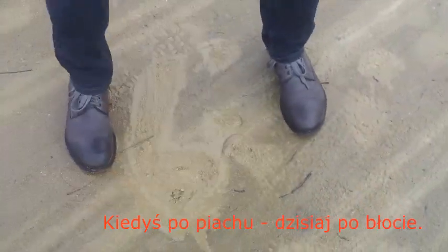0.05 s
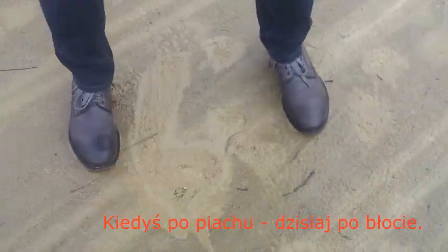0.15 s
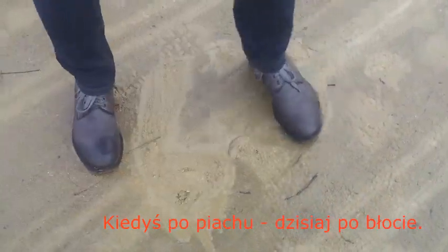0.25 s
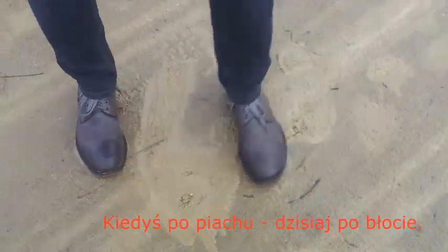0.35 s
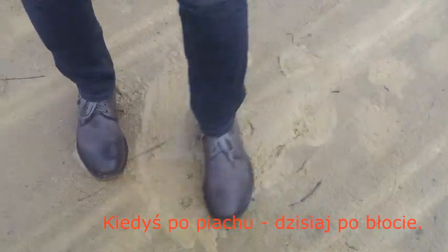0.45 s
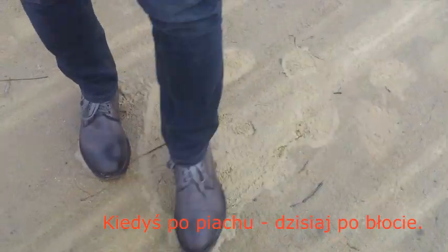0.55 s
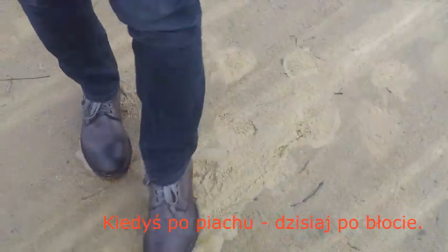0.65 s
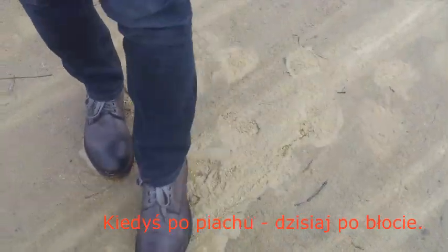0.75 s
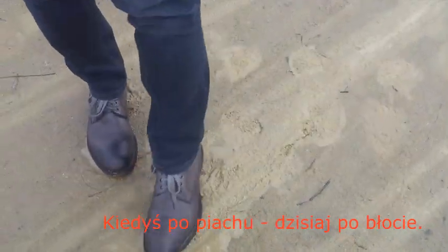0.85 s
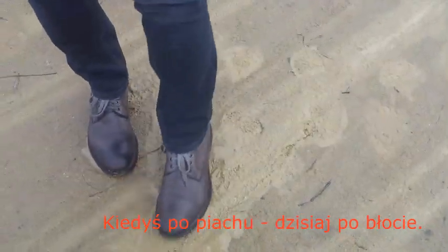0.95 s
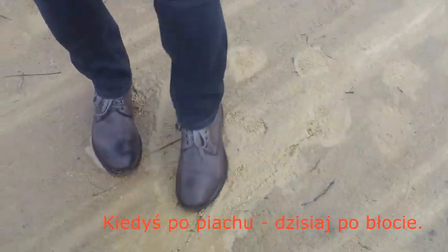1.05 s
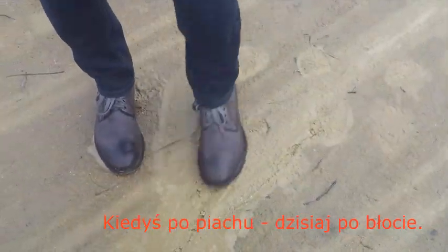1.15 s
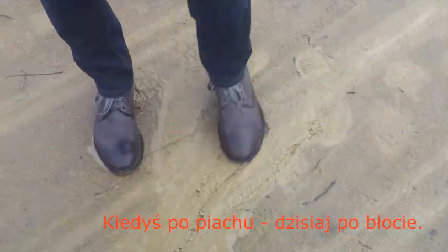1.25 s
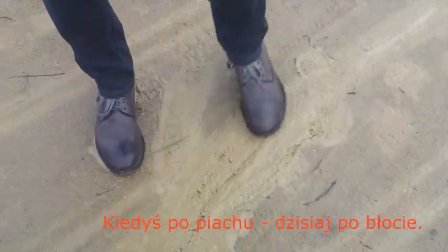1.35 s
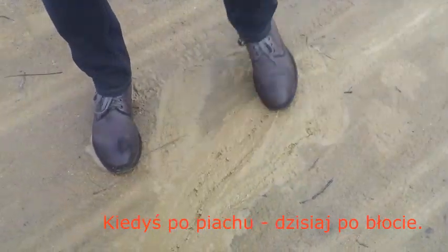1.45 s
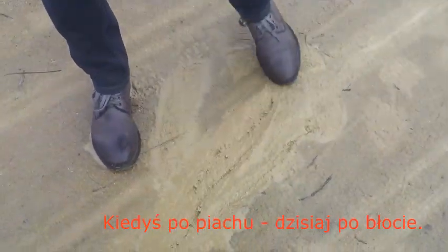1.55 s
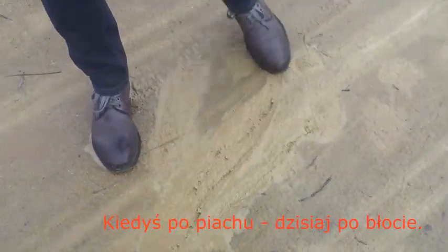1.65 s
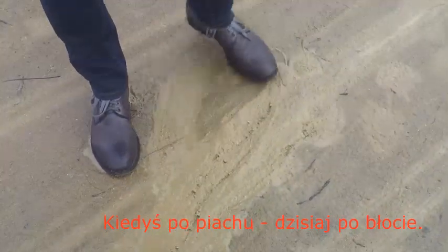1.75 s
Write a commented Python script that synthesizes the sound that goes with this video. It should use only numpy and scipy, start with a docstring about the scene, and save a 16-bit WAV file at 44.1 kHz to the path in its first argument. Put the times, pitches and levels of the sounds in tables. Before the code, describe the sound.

Close outdoor pickup of two gritty shoe scrapes in sand and mud: sharp crackle, squeaky slips and dull low thumps, a short lull between them, then a fade and tiny wet ticks over faint air.

```python
"""On a paved path, a shoe sole scrapes twice through wet sand and mud, close to a camera's microphone.
From about 0.2 s the first scrape crackles with clicking sand grains, sines ring for the slips of the sole,
noise bursts crunch as bigger grit and low sines thump in the mud. It thins near 0.75 s; the second scrape
builds from about 1 s and fades. Near 1.7 s a few drops tick with rising pitch as the shoe lifts.
Shaped noise, faint outdoor air, lies under it all."""
import sys
import numpy as np
from scipy import signal
from scipy.fft import rfft, irfft, next_fast_len
from scipy.io import wavfile
from scipy.ndimage import uniform_filter1d, map_coordinates

SR = 44100
rng = np.random.default_rng(int(sys.argv[2]) if len(sys.argv) > 2 else 0)


def log_audio(samples):
    """Write samples as a 16-bit WAV file to the path given in sys.argv[1]."""
    # one column per channel
    frames = np.atleast_2d(samples).T
    # limit to full scale, then quantise
    limited = np.clip(frames, -1, 1)
    pcm = np.round(limited * 32767).astype(np.int16)
    wavfile.write(sys.argv[1], SR, pcm)


N = 79380


def amp(db):
    """Decibels to amplitude."""
    return 10 ** (np.asarray(db) / 20)


def unit(x):
    """x scaled to rms 1."""
    return x / np.sqrt(np.mean(x ** 2) + 1e-20)


def along(points, hz):
    """Value at hz between (frequency, value) points on a log frequency axis."""
    point_hz, value = np.transpose(points)
    return np.interp(np.log(hz + 1), np.log(point_hz + 1), value)


def filtered(x, response):
    """x times a response of frequency, with zero padding for the tail."""
    m = next_fast_len(N + SR // 4)
    spectrum = rfft(x, m) * response(np.fft.rfftfreq(m, 1 / SR))
    return irfft(spectrum, m)[..., :N]


def band_unit(x, lo_hz, hi_hz):
    """x scaled so that its rms inside a band is 1."""
    return x / np.std(filtered(x, lambda hz: (hz > lo_hz) & (hz < hi_hz)))


def wobble(knots_per_s):
    """A smooth random curve through evenly spaced knots."""
    return map_coordinates(rng.standard_normal(4000), [np.arange(N) * knots_per_s / SR])


BIGGEST = 3  # cap on the random size step


def sizes(u, scatter_db):
    """Event sizes from uniform draws: many small, few large, none huge."""
    return amp(scatter_db * np.minimum(-np.log(1 - u), BIGGEST))


def crackle(per_s, scatter_db):
    """Random clicks of uneven size and either sign, rms 1."""
    chance, side, size = rng.random((3, N))
    happens = chance < per_s / SR
    return unit(happens * np.sign(side - .5) * sizes(size, scatter_db))


# The sole's path through the two scrapes; levels are relative, each layer adds its own trim:
# start_s, grit_db, gap_db (ring of the gap), mud_db (drag), tread_db (ring of the tread),
# tread_hz, grain_hz (pitch of the grains), fizz_db (over the grit)
STROKES = [(0.0, -51.5, -43, -61, -42.5, 4280, 6500, -3), (0.13, -43.5, -52.5, -50, -43.5, 4020, 5970, -19),
           (0.204, -42, -31.5, -43, -39, 3320, 5950, -9), (0.224, -33, -36, -48, -29, 3470, 6000, -13),
           (0.261, -18, -21.5, -29, -36, 3700, 6300, -18),
           (0.32, -16.5, -16.5, -40, -39, 4270, 6020, -15.5),
           (0.334, -21.5, -14.5, -39, -45, 3820, 6760, -16),
           (0.366, -17.5, -21.5, -33.5, -37, 3350, 6540, -10),
           (0.39, -25, -41, -39.5, -45, 3700, 6250, -11.5), (0.426, -25, -25, -36, -26, 3900, 6000, -18),
           (0.47, -27.5, -32, -40, -36, 3860, 6000, -16), (0.527, -23, -20, -37.5, -24, 3500, 6320, -9),
           (0.579, -34.5, -29, -40, -36, 3330, 6000, -10),
           (0.611, -27, -25.5, -40, -19.5, 3320, 6100, -5.5),
           (0.63, -33.5, -29.5, -38, -31, 3500, 6200, -10),
           (0.698, -27.5, -21.5, -41.5, -44, 3340, 6160, -10.5),
           (0.734, -48, -39, -53.5, -44, 4260, 6100, -14), (0.846, -30, -30, -44.5, -46, 4700, 5640, -12),
           (0.903, -34, -22.5, -40.5, -31, 3700, 6040, -8),
           (0.982, -23.5, -24.5, -41, -24.5, 4370, 5730, -11),
           (1.012, -22, -30, -45, -48, 4150, 5770, -4.5), (1.03, -20, -19, -46, -44, 4000, 6200, -17),
           (1.06, -29.5, -23.5, -33.5, -18, 4440, 5700, -8), (1.08, -17.5, -28, -47, -35, 4340, 5930, -13),
           (1.102, -27.5, -19, -42, -37, 3900, 5800, -5.5),
           (1.119, -22.5, -19, -45.5, -63, 3650, 6740, -13), (1.138, -18, -13.5, -39, -17, 3660, 6600, -5),
           (1.146, -15.5, -31, -39.5, -43, 3830, 6100, -14),
           (1.168, -29.5, -28, -38.5, -24, 4180, 5900, -7),
           (1.178, -21.5, -26.5, -39, -26, 4140, 6300, -10),
           (1.208, -24, -22.5, -44, -25, 4040, 6250, -16.5),
           (1.228, -22, -42, -40.5, -28, 4180, 5600, -10.5), (1.267, -25, -21, -35, -22.5, 3800, 6060, -12),
           (1.311, -19.5, -72, -34, -26, 4560, 6420, -8), (1.341, -23.5, -38, -40.5, -25, 3670, 6580, -9),
           (1.422, -28, -56, -42, -24, 4500, 6250, -8), (1.457, -25, -71, -37, -24, 4680, 6500, -4),
           (1.498, -34.5, -42, -42, -39, 4820, 6330, -2), (1.532, -35.5, -58, -43, -28, 5300, 5300, 3.5),
           (1.604, -42, -45.5, -51, -41.5, 4250, 5700, -13), (1.67, -52, -54, -64, -45, 4270, 6050, -5),
           (1.72, -61, -74, -80.5, -76, 4060, 6600, 1)]
STROKE_COLUMNS = ("start_s", "grit_db", "gap_db", "mud_db", "tread_db", "tread_hz", "grain_hz", "fizz_db")


def stroke(column):
    """One named stroke column, drawn as straight lines between its times."""
    rows = np.transpose(STROKES)
    return np.interp(np.arange(N) / SR, rows[0], rows[STROKE_COLUMNS.index(column)])


# Spectrum of crackling sand: pitch_hz, level_db (relative, per Hz)
GRIT = [(530, -23), (900, -11.5), (1750, -16.5), (2130, -7), (3170, -10), (3480, -4), (3960, -4.5),
        (4950, -6.5), (5490, -7.5), (6170, -2), (7620, -3), (10900, -13.5), (14600, -46)]
GRIT_PER_S, GRIT_SCATTER_DB, GRIT_CLUMP_DB = 5000, 3, 1
GRIT_DB, FIZZ_DB = -6, -1.5  # trims on the stroke levels
FIZZ_FROM_HZ = 7700


def grit():
    """Sand grains snap under the sole as clumped clicks; their finest fizz has its own share."""
    clumps_db = GRIT_CLUMP_DB * (wobble(60.07) + wobble(250))
    clicks = crackle(GRIT_PER_S, GRIT_SCATTER_DB) * amp(clumps_db)
    sand = filtered(clicks, lambda hz: amp(along(GRIT, hz)) * (hz < FIZZ_FROM_HZ))
    fizz = filtered(clicks, lambda hz: amp(along(GRIT, hz)) * (hz > FIZZ_FROM_HZ))
    sand = band_unit(sand, 4900, 7600) * amp(GRIT_DB)
    fizz = band_unit(fizz, 8000, 11500) * amp(stroke("fizz_db") + FIZZ_DB)
    return (sand + fizz) * amp(stroke("grit_db"))


SLIP_CLUMP_DB = 1.1


def slips(kind, level_db, pitch_hz):
    """Each slip of the sole rings for a few cycles near the pitch of the moment."""
    per_s, scatter_db, cycles, spread = kind
    when, detune, size, phase = rng.random((4, int(per_s * N / SR), 1))
    start = (when * N).astype(int)
    t = np.arange(400) / SR
    hz = pitch_hz[start] * np.exp(spread * np.sqrt(12) * (detune - .5))  # even spread of log pitch
    envelope = amp(-20 * hz * t / cycles) * (1 - np.exp(-hz * t))
    rings = sizes(size, scatter_db) * np.sin(2 * np.pi * (hz * t + phase)) * envelope
    at = start + np.arange(len(t))
    train = np.bincount(at.ravel(), rings.ravel(), minlength=N)[:N]
    return unit(train * amp(SLIP_CLUMP_DB * wobble(120))) * amp(level_db)


# Pitch of the air gap under the sole: start_s, pitch_hz
GAP_PITCH = [(0, 1920), (.195, 1980), (.205, 1200), (.238, 1210), (.244, 1940), (.35, 2410), (.40, 1820),
             (.49, 2330), (.535, 2410), (.545, 1670), (.59, 1750), (.598, 2130), (.612, 1630), (.65, 1750),
             (.658, 2130), (.71, 2570), (.75, 2700), (.78, 2340), (.84, 1990), (.885, 2515), (1.05, 2545),
             (1.14, 2230), (1.3, 2200), (1.8, 1900)]
# How the slips ring: slips per s, size scatter dB, cycles to fall 20 dB, relative pitch spread
GAP, TREAD, GRAINS = (1000, 4, 12, .04), (2000, 3, 7, .11), (2200, 3.5, 12, .085)
RUB = (2000, 3.5, 4, .15)  # looser slips round the pitch of the gap
GAP_DB, RUB_DB, TREAD_DB, GRAINS_DB = -8.5, -10, -5.5, -6.5  # trims on the stroke levels


def sole_rings():
    """The gap between sole and paving rings as it opens and closes, with the tread and the grains."""
    gap_hz = np.interp(np.arange(N) / SR, *np.transpose(GAP_PITCH))
    gap = slips(GAP, stroke("gap_db") + GAP_DB, gap_hz)
    rub = slips(RUB, stroke("gap_db") + RUB_DB, gap_hz)
    tread = slips(TREAD, stroke("tread_db") + TREAD_DB, stroke("tread_hz"))
    grains = slips(GRAINS, stroke("grit_db") + GRAINS_DB, stroke("grain_hz"))
    return gap + rub + tread + grains


# Bigger grit crushed: start_s, peak_db, pitch_hz, length_s, wide_db (wide crackle over the rough ring)
CRUNCHES = [(0.1616, -30, 5580, 0.014, -5), (0.2266, -15, 1146, 0.0054, -17),
            (0.258, -15, 5640, 0.011, -18), (0.2663, -18, 2000, 0.01, -16), (0.292, -8, 5830, 0.0056, -16),
            (0.318, -14, 2040, 0.0087, -14), (.3487, -8, 6900, 0.0044, -10),
            (0.3543, -11, 2690, 0.0037, -13), (0.3675, -8, 6460, 0.0038, -9),
            (0.4014, -24, 1780, 0.0072, -12), (0.5, -21, 2420, 0.0049, -8), (.507, -18, 6560, 0.0093, -14),
            (0.521, -11, 6300, 0.0063, -8), (0.5253, -14, 2350, 0.0057, -16),
            (0.5446, -10.5, 3070, 0.0038, 1), (.5516, -17.5, 6480, .007, -11),
            (0.557, -20, 1590, 0.0099, -9), (0.594, -20, 2240, 0.0059, -20), (0.611, -23, 3060, 0.0042, -3),
            (0.616, -20, 6500, 0.0076, -14), (.6226, -23, 1550, 0.0088, -11),
            (0.6616, -20.5, 2210, 0.0053, -15), (0.687, -20, 2416, 0.0082, -15),
            (0.7774, -26, 2380, 0.0049, -17), (0.886, -17, 2690, 0.0058, 4), (0.865, -25, 1340, 0.012, -14),
            (0.971, -25, 2510, 0.0053, 3), (0.991, -20, 5480, 0.0062, -12),
            (1.0277, -13.5, 6560, .005, -14), (1.028, -15.5, 2470, 0.011, -11),
            (1.036, -8, 5850, 0.0046, -2), (1.0403, -11, 2470, 0.0045, -8),
            (1.0517, -12.5, 2380, 0.0081, -22), (1.0767, -11, 5400, 0.0047, -10),
            (1.084, -12, 2380, 0.0052, 4), (1.0895, -18, 5500, 0.0078, -11),
            (1.115, -4.5, 6530, 0.0088, -5), (1.1332, -9, 4370, 0.013, -8), (1.1337, -13, 3120, 0.015, -14),
            (1.1368, -13, 2127, 0.02, -10), (1.153, -32, 2310, 0.0034, -24), (1.18, -12, 6480, 0.0063, -14),
            (1.2562, -15.5, 2980, 0.012, 0), (1.2608, -10.5, 6700, 0.0098, -3),
            (1.2874, -16.5, 5900, 0.008, -17), (1.3023, -10.5, 6360, 0.02, -8),
            (1.314, -12, 6160, 0.02, -23), (1.341, -15, 6070, 0.0047, -25),
            (1.3503, -10, 5990, 0.018, -0.5), (1.446, -15, 5200, 0.011, 2), (1.462, -14.5, 6500, .008, -3),
            (1.5255, -24, 5870, .008, 0), (1.614, -27.5, 5840, 0.0046, 14), (1.634, -30.5, 5860, 0.012, 6)]
CRUNCH_WIDTH, CRUNCH_CLEAR = .13, 1.5  # relative band width, clear ring over the rough one


def crunches():
    """Crushed grit bursts round one pitch each: a rough noise ring, a clear sine and a wide crackle."""
    out, t = np.zeros(N + SR), np.arange(1024) / SR
    f = np.fft.rfftfreq(len(t), 1 / SR)
    for start_s, peak_db, hz, length_s, wide_db in CRUNCHES:
        ring_noise, wide_noise = rng.standard_normal((2, len(t)))
        band = 1 / (1 + ((f - hz) / (CRUNCH_WIDTH * hz / 2)) ** 2)
        rough = unit(irfft(rfft(ring_noise) * band))
        clear = CRUNCH_CLEAR * np.sin(2 * np.pi * hz * t)
        wide = amp(wide_db) * unit(irfft(rfft(wide_noise) * amp(along(GRIT, f))))
        u = t / max(length_s, 1e-3) * 4
        burst = np.sqrt(u) * np.exp(-u) * (rough + clear + wide)
        out[round(start_s * SR):][:len(t)] += amp(peak_db) * burst / np.abs(burst).max()
    return out[:N]


# Spectrum of the mud drag: pitch_hz, level_db (relative, per Hz)
MUD = [(59, -30), (100, -9.5), (231, -1), (291, -1.5), (342, -11), (531, -3), (663, -7.5), (1600, -4.5),
       (2080, -50), (3520, -120)]
MUD_PER_S, MUD_SCATTER_DB, MUD_DB = 1500, 1, -0.5  # MUD_DB trims the stroke level


def mud():
    """The sole pushing mud drags dully: random clicks through the mud spectrum."""
    drag = filtered(crackle(MUD_PER_S, MUD_SCATTER_DB), lambda hz: amp(along(MUD, hz)))
    return unit(drag) * amp(stroke("mud_db") + MUD_DB)


# The sole presses the mud: start_s, level_db (before the soft onset), pitch_hz, cycles (to fall 20 dB)
THUMPS = [(0.248, -30, 230, 5), (0.253, -21.5, 97, 2), (.31, -20.5, 505, 7.5), (0.372, -22.5, 140, 2),
          (1.218, -26.5, 226, 8.5), (1.261, -14.5, 164, 1), (1.34, -35.5, 251.5, 20.5),
          (1.458, -27, 560, 11)]


def thumps():
    """Soft pushes into mud: low decaying sines of slightly unsteady pitch."""
    out, t = np.zeros(N + SR), np.arange(4096) / SR
    for start_s, level_db, hz, cycles in THUMPS:
        drift = uniform_filter1d(rng.standard_normal(len(t)), size=200) * np.sqrt(200)
        turns = hz * np.cumsum(1 + 0.11 * drift) / SR
        envelope = amp(level_db - 20 * hz * t / cycles) * (1 - np.exp(-hz * t))
        out[round(start_s * SR):][:len(t)] += envelope * np.sin(2 * np.pi * turns)
    return out[:N]


# Drops as the shoe lifts: start_s, level_db (at the start), pitch_hz (at the start)
DROPS = [(1.699, -25, 3970), (1.7053, -32, 6140), (1.714, -25, 7160), (1.7225, -35, 4240)]
DROP_T60_S, DROP_RISE = 0.006, 0.38  # time to fall 60 dB, extra turns share by then


def drops():
    """Each drop ticks as a short decaying sine of rising pitch."""
    out, t = np.zeros(N + SR), np.arange(1024) / SR
    for start_s, level_db, hz in DROPS:
        turns = hz * t * (1 + DROP_RISE * t / DROP_T60_S)
        tick = amp(level_db - 60 * t / DROP_T60_S) * np.sin(2 * np.pi * turns)
        out[round(start_s * SR):][:len(t)] += tick
    return out[:N]


SCATTER_T60_S = .007


def scattered(x):
    """Sound scattered round the camera body: a short random tail, new for every 1024 samples."""
    hop, t = 1024, np.arange(1024) / SR
    pieces = np.pad(x, (0, -N % hop)).reshape(-1, hop)
    tails = rng.standard_normal((len(pieces), len(t))) * amp(-60 * t / SCATTER_T60_S)
    tails /= np.linalg.norm(tails, axis=1, keepdims=True)
    wet = signal.fftconvolve(pieces, tails, axes=1)
    at = hop * np.arange(len(pieces))[:, None] + np.arange(wet.shape[1])
    return np.bincount(at.ravel(), wet.ravel())[:N]  # overlap and add


# Spectrum of the outdoor air: pitch_hz, level_db (relative, per Hz)
AIR = [(24, -15), (38, 1), (51, 10.5), (75, -0.5), (141, -1.5), (220, -10.5), (450, -10.5), (992, -14.5),
       (2240, -16), (2600, -13), (3410, -18), (4700, -12.5), (14600, -26.5)]
AIR_DB = -45.5  # rms ahead of the microphone ports


def air():
    """Faint outdoor hiss and rumble: shaped noise, uneven in patches of time and frequency."""
    z = signal.stft(rng.standard_normal((2, N)), nperseg=512)[2]
    patches = uniform_filter1d(rng.standard_normal(z.shape[1:]), size=8, axis=0)
    patches = uniform_filter1d(patches, size=10, axis=1)
    pair = signal.istft(z * amp(1.5 * unit(patches)), nperseg=512)[1][:, :N]
    return amp(AIR_DB) * unit(filtered(pair, lambda hz: amp(along(AIR, hz))))


# Left-right likeness at the microphone ports: pitch_hz, likeness (0 to 1)
ALIKE = [(60, .85), (300, .83), (1000, .86), (1600, .8), (2400, .96), (3300, .5), (3900, .25), (4400, .75),
         (5000, .3), (5900, .88), (7000, .7), (7700, .25), (8600, .6), (10000, .4), (14000, .3)]
# Level of the left port over the right: pitch_hz, level_db
LEAN = [(150, 2.5), (300, 2.0), (600, 0.5), (1100, -1.6), (1600, -1.8), (2200, 0.6), (2800, 3.6),
        (3300, 2.8), (3800, -1.6), (4400, -0.2), (5000, 10.2), (6200, 9.6), (6800, 7.8), (7400, 2.1),
        (8800, 7.6), (10000, 5.0), (14000, 8.3)]
# Phase by which the right port leads: pitch_hz, lead_rad
LEAD = [(3100, 0), (4300, 4.8), (5500, 6.3), (6500, 6.5), (8200, 11), (10000, 12.5)]


def ports(pair):
    """The left port hears the direct sound, the right a mix with the scattered one."""
    def mix(hz):
        alike = np.clip(along(ALIKE, hz), 0, 1)
        return np.array([alike, np.sqrt(1 - alike ** 2)])

    def lean(hz):
        level = amp(np.outer([.5, -.5], along(LEAN, hz)))
        return level * np.exp(1j * np.outer([0, 1], along(LEAD, hz)))

    same, other = filtered(pair, mix)
    return filtered(np.array([pair[0], same + other]), lean)


def scene():
    """The shoe close to the two microphone ports, over the outdoor air."""
    shoe = grit() + sole_rings() + mud() + crunches() + drops() + thumps()
    return ports(np.array([shoe, scattered(shoe)]) + air())


# Narrow rings of the camera housing: pitch_hz
BODY_HZ = [3560, 4420, 5520, 6060, 6960]
BODY_WIDTH_HZ, BODY_DB = 118, 2  # half width and boost of each ring
CLIP, TOP_HZ = .98, 14800  # ceiling in amplitude, band limit


def record(dry):
    """The housing boosts narrow bands, peaks clip at a ceiling, then the band limit cuts the top."""
    def housing(f):
        rings = sum(1 / (1 + ((f - hz) / BODY_WIDTH_HZ) ** 2) for hz in BODY_HZ)
        return amp(BODY_DB * (rings - .5 * (f > 3000)))  # treble between the rings sits lower

    clipped = np.clip(filtered(dry, housing), -CLIP, CLIP)
    return filtered(clipped, lambda hz: hz < TOP_HZ)


dry = scene()
out = record(dry)
log_audio(out)
```